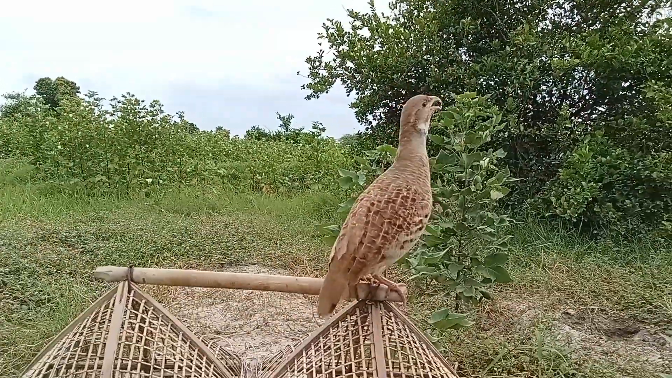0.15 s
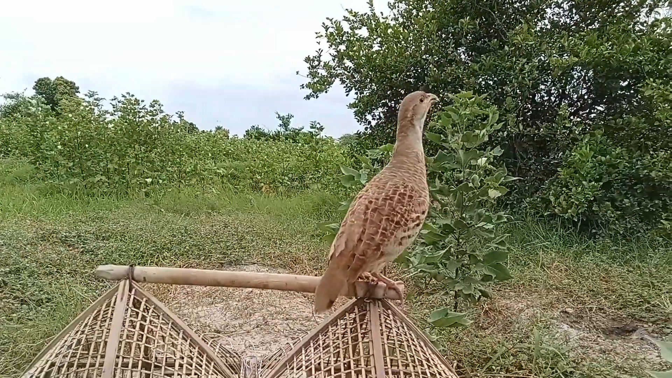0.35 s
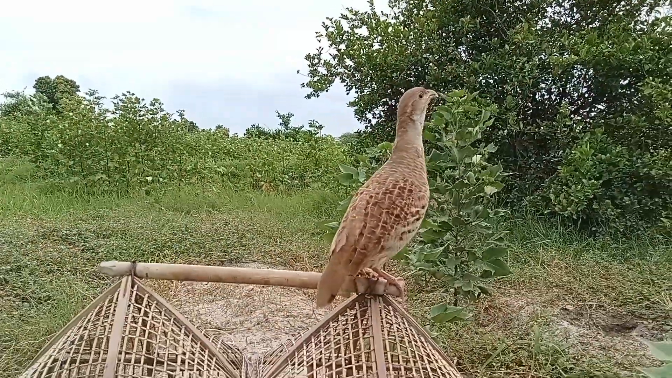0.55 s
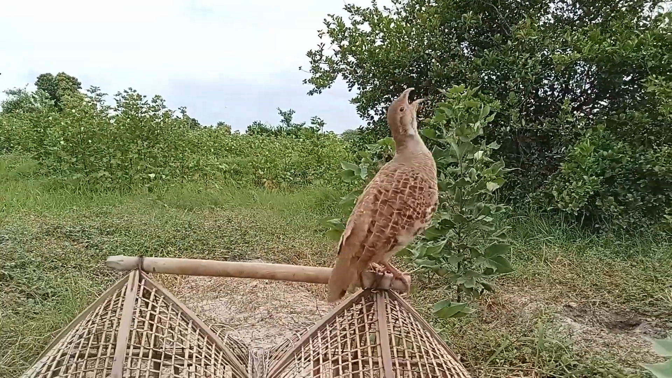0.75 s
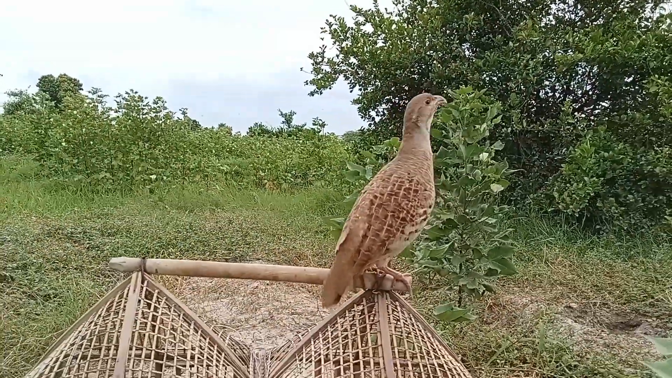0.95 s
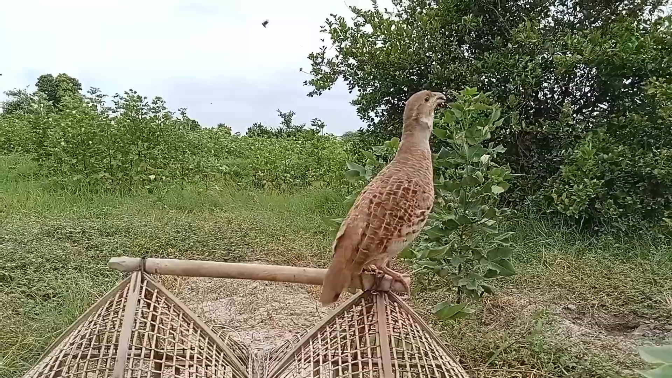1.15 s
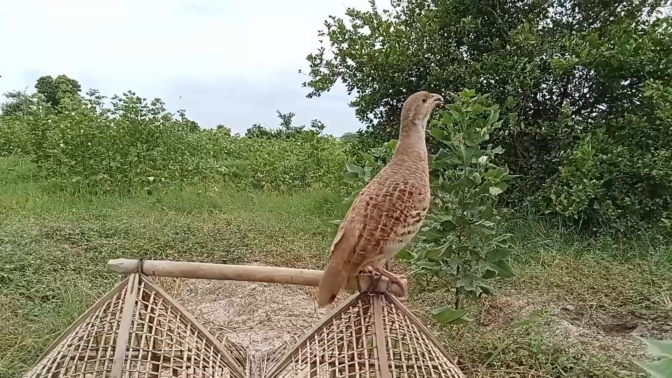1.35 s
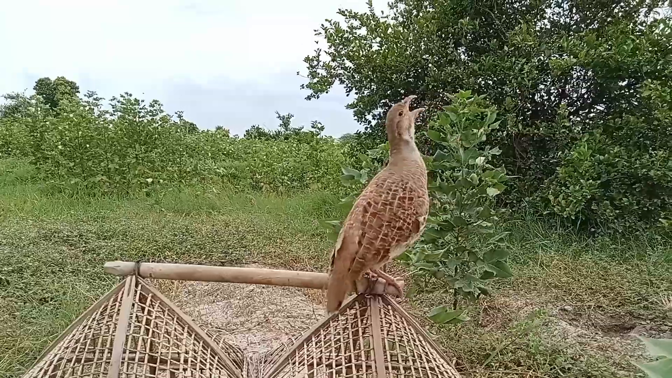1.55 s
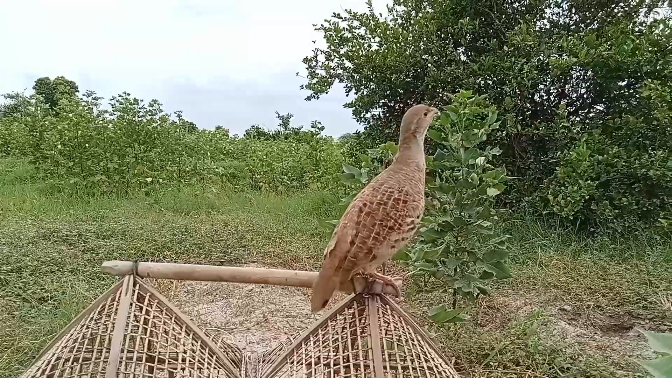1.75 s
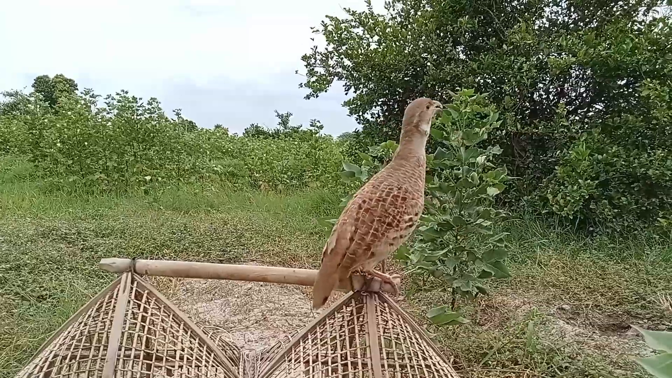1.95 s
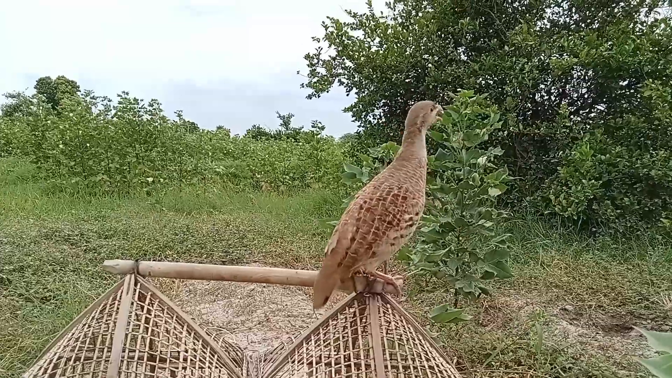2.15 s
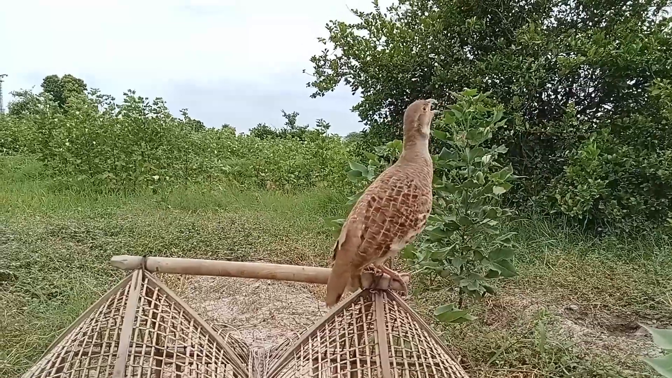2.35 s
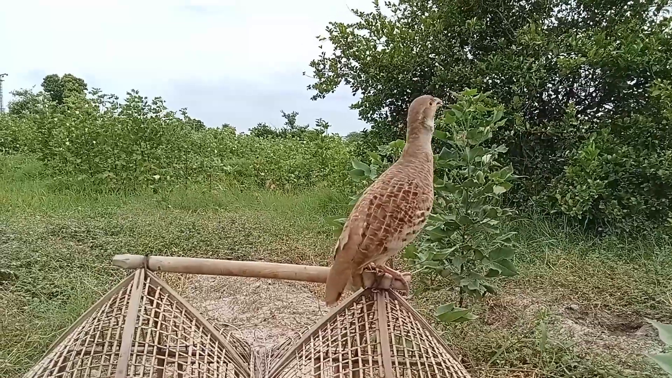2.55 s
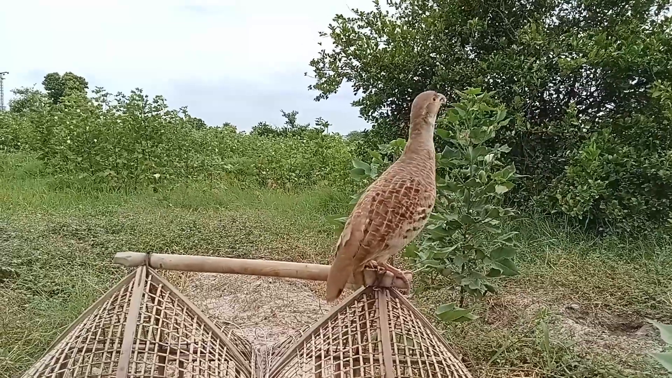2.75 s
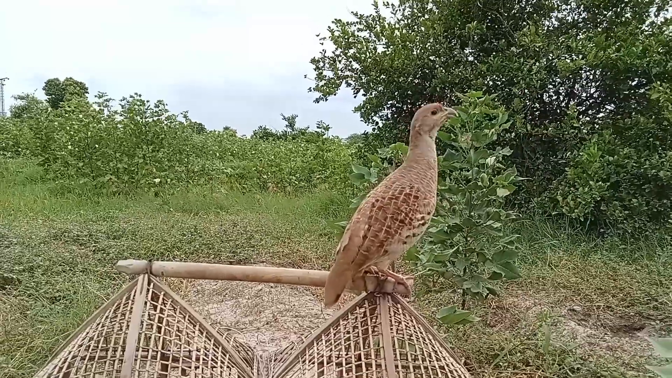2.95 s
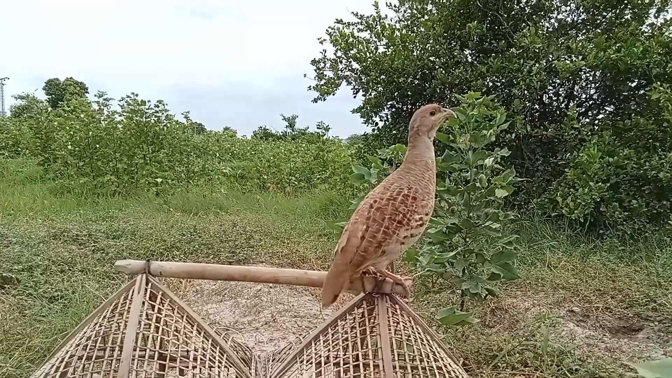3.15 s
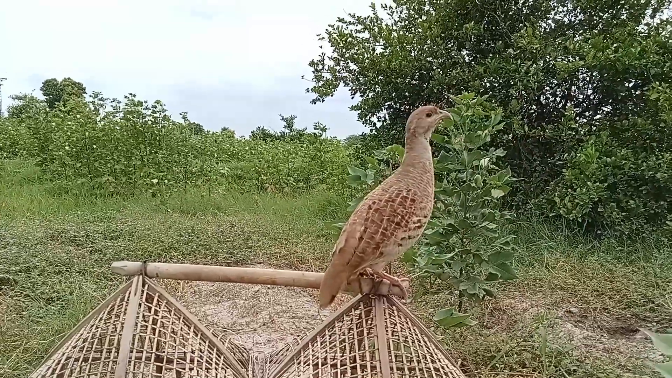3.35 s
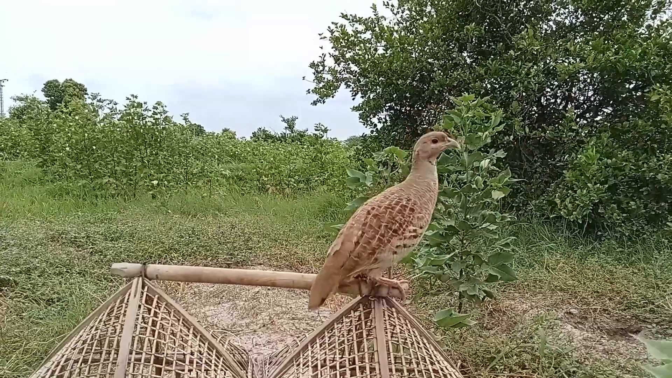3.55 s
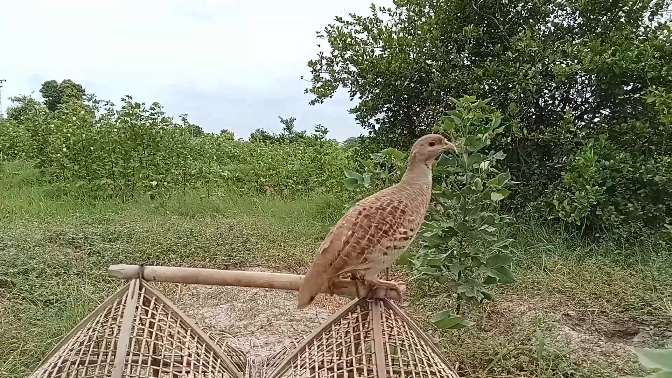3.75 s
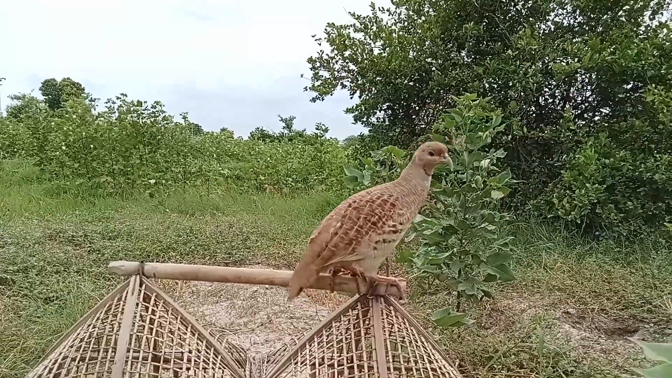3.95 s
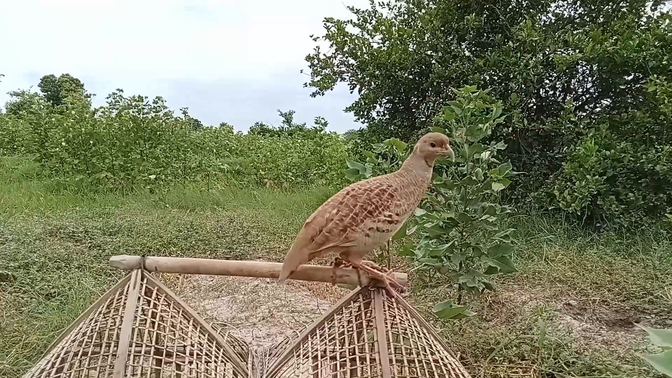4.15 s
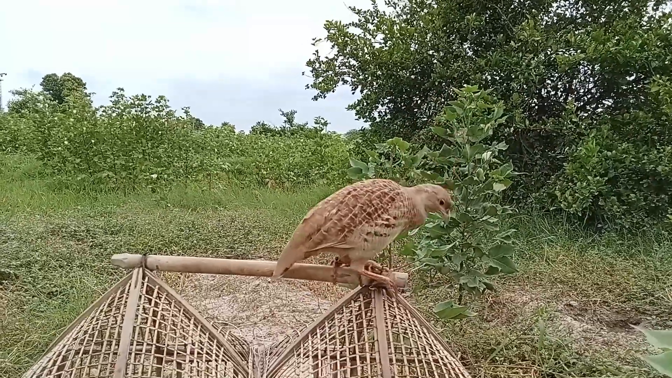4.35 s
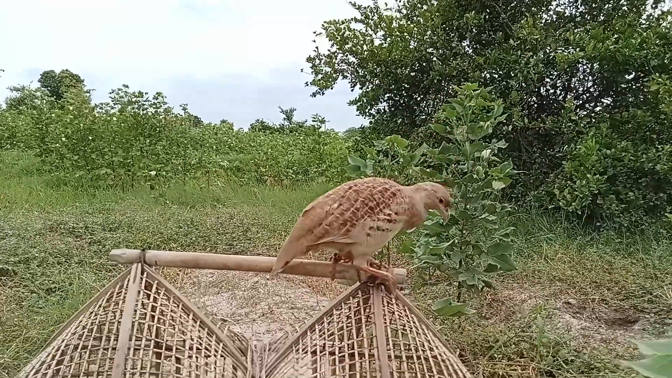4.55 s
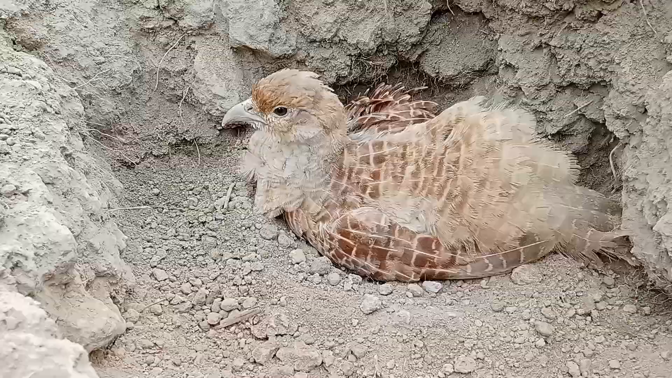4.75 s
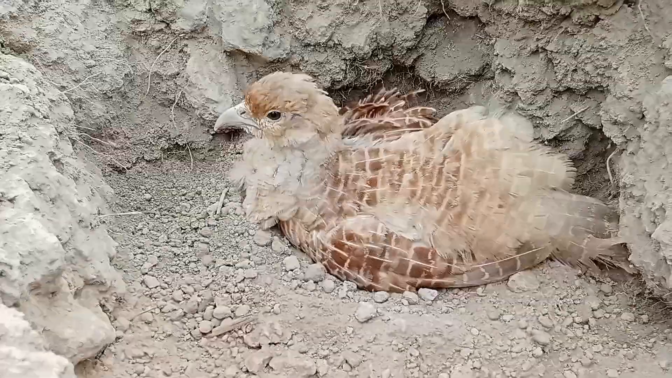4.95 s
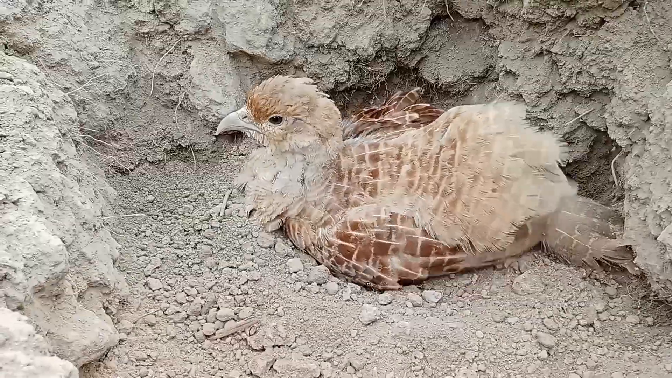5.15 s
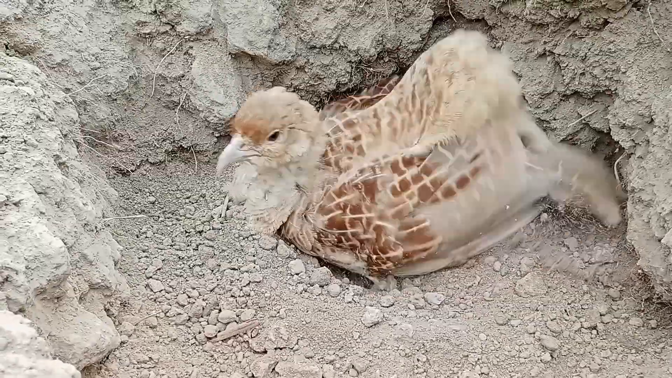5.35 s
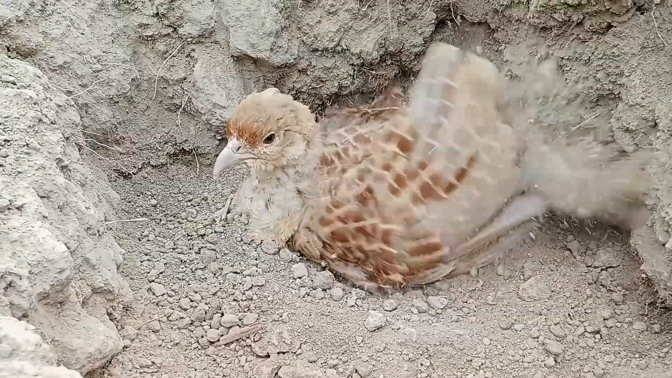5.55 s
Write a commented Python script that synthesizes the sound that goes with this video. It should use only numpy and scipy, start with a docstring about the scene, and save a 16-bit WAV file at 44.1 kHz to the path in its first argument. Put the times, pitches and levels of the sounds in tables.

```python
"""Francolins call in an open field: a voice of locked partials gives sharp clucks and ringing cries.
Soft mews come between, soon joined by a second bird's rising whistles, gliding tones with a thin hiss.
After a coo, a gust of coloured noise, decaying thumps and dry ticks buffets the microphone.
Four more mews and another coo follow. The sound drops out for a moment and returns over a dull rush;
then a bird shuffles in a dust bath, in short bouts of rustling noise."""
import sys
import numpy as np
from scipy import signal
from scipy.fft import rfft, irfft, next_fast_len
from scipy.io import wavfile
from scipy.ndimage import uniform_filter1d

SR = 44100
rng = np.random.default_rng(int(sys.argv[2]) if len(sys.argv) > 2 else 0)


def file_out(sig):
    """Save sig as 16-bit WAV at sys.argv[1]."""
    # one column per channel
    cols = np.atleast_2d(sig).T
    # limit, then scale
    lim = np.clip(cols, -1, 1)
    pcm = np.round(lim * 32767).astype(np.int16)
    wavfile.write(sys.argv[1], SR, pcm)


N = 250929
TIME = np.arange(N) / SR
TOP_HZ = 15650  # upper limit of the voices' partials and of the whole sound

# clucks: peak_s, rise_s, fall_s, pitch_hz (at the peak), level_db, added_roughness (0-1)
CLUCK_NOTES = [(.001, 0.025, 0.034, 490, -30, 0.56), (0.101, 0.047, 0.023, 525, -16, 0.08),
               (.220, 0.04, 0.028, 508, -16.5, 0.17), (0.344, 0.038, 0.02, 489.3, -19.5, 0.28),
               (0.454, 0.035, 0.026, 450.6, -25.5, 0.46), (.976, 0.049, 0.015, 525.3, -16.5, 0.01),
               (1.091, 0.038, 0.023, 512.3, -16, 0.1), (1.212, 0.036, 0.032, 517.3, -17.5, 0.17),
               (1.324, 0.026, 0.0087, 508, -28, 0.73), (1.735, 0.046, 0.015, 521, -18, 0),
               (1.844, 0.035, .033, 518.6, -17, 0.08), (1.961, 0.033, 0.029, 492.3, -21, 0.44),
               (2.47, 0.046, 0.015, 525, -17.5, 0.05), (2.572, 0.033, 0.03, 513.4, -18, 0.15),
               (2.699, 0.045, 0.017, 445, -24, 0.59)]
# cries: clear_onset_s, pitch_ratio, level_db
CRY_NOTES = [(.672, 1.016, -20.5), (1.429, 1.023, -19), (2.161, 1, -20.5)]
# mews: start_s, end_s, pitch_hz, glide_share (of pitch), final_sag_share (of pitch), level_db,
# roughness (0-1), brightness_db, undertone_db (at the start)
MEW_NOTES = [(0.5, 0.585, 576, 0.046, 0.11, -34, 0.14, -3, -19),
             (0.576, 0.656, 514, -0.049, .02, -37, 0.18, 1, -37),
             (.902, 1, 528.6, 0.28, .04, -37, 0, 4.5, -29.5),
             (0.986, 1.061, 544, -0.24, .06, -35, 0.05, -8, -25),
             (1.213, 1.269, 592, -.15, .03, -38, 0.2, 13.5, -40),
             (1.85, 1.948, 533, 0.034, .04, -40, 0, 12, -25.5),
             (2.864, 2.932, 594, -.15, 0.017, -42.5, 0.1, -1, -25.5),
             (3.61, 3.768, 705, -0.17, 0.35, -34, 0.15, 7.5, -1),
             (3.887, 4.036, 589.6, -.17, 0.25, -37.5, 0.1, 4.5, -31),
             (4.143, 4.309, 581, -0.08, 0.36, -36.5, 0.09, 0, -23),
             (4.428, 4.589, 566, -0.065, 0.3, -35.5, 0.14, -2, -23.5)]
# coos: start_s, end_s, first_pitch_hz, settled_pitch_hz, level_db
COO_NOTES = [(2.625, 2.777, 849, 654, -39.5), (3.833, 3.891, 950, 585, -45)]
# strengths of a coo's first four partials: level_db
COO_PARTIAL_LEVELS = [0.5, -8, -13.5, -25.5]
# whistles: start_s, loudest_s, end_s, first_pitch_hz, limiting_pitch_hz, level_db
WHISTLE_NOTES = [(1.263, 1.291, 1.435, 1950, 3008, -21.5), (1.905, 1.958, 2.112, 2070, 2970, -25),
                 (2.628, 2.705, 2.858, 1960, 2932, -24)]
# throat and beak resonance in the clucks: frequency_hz, gain_db
CLUCK_RESONANCE = [(250, -16), (550, -1.5), (1100, 4), (1600, 3.5), (2300, 0.5), (3300, -9.5),
                   (4400, -24.5), (5700, -17.5), (7000, -53.5), (10000, -47.5), (12500, -35), (14300, -28),
                   (15600, -29)]
# throat and beak resonance in the cries: frequency_hz, gain_db
CRY_RESONANCE = [(250, -25.5), (520, -8.5), (1040, -1.5), (1560, 2), (2080, 2.5), (3120, -2), (4200, -14.5),
                 (5300, -17.5), (6200, -25), (7200, -52.5), (8400, -40.5), (10500, -43), (12400, -36),
                 (14500, -22)]
# throat and beak resonance in the mews: frequency_hz, gain_db
MEW_RESONANCE = [(250, -9), (550, -3), (850, -7.5), (1120, 4.5), (1650, -3), (2150, -25), (2800, -14.5),
                 (3400, -35.5), (4200, -46.5), (6000, -52.5), (7500, -70), (14000, -44)]
# spectrum of the whistles' hiss: frequency_hz, gain_db
WHISTLE_HISS_SPECTRUM = [(500, -10.5), (1500, -8.5), (2400, -6), (3300, 1.5), (4300, -8), (5600, -17.5),
                         (7000, -30), (10000, -35), (12500, -21), (15500, -22)]
# strength of the gust: time_s, level_db (relative)
GUST_COURSE = [(2.74, -44.5), (2.8, -42), (2.89, -34.5), (3.27, -34.5), (3.4, -44), (3.489, -54.5),
               (3.6, -70)]
# spectrum of the gust's body: frequency_hz, gain_db
GUST_SPECTRUM = [(50, -34), (100, -4.5), (150, -10.5), (250, -8.5), (390, 1.5), (550, -7.5), (720, -11.5),
                 (1000, -18), (1600, -24), (2700, -31.5), (4000, -43), (5500, -71.5), (9000, -69)]
# spectrum of the thin hiss in the gust and dust: frequency_hz, gain_db
HISS_SPECTRUM = [(600, -28), (1500, -28), (3500, 17.5), (5500, -2.5), (7500, -23.5), (10000, -14.5),
                 (12500, 14.5), (14500, 15), (15500, 16.5)]
# buffets: start_s, level_db (relative), pitch_hz
BUFFET_THUMPS = [(2.856, -20.5, 392), (2.902, -20, 427), (3.036, -16.5, 388), (3.098, -22.5, 139),
                 (3.152, -17, 423), (3.214, -16.5, 377), (3.235, -27.5, 310), (3.273, -24, 190),
                 (3.335, -22, 383), (3.361, -27, 102), (3.54, -24.5, 177)]
# ticks and scrapes within the gust: start_s, initial_level_db, decay_s
TICK_EVENTS = [(2.905, -35, .006), (2.947, -44, .001), (2.957, -31, .009), (3.06, -43, .0008),
               (3.079, -44, .003), (3.118, -42, .0008), (3.177, -40, .0008), (3.236, -41, .0008)]
# spectrum of the ticks and the gust's crackle: frequency_hz, gain_db
TICK_SPECTRUM = [(500, 7.5), (1800, 10.5), (3500, -2.5), (5000, -23.5), (8000, -46), (11000, -25),
                 (14500, -13)]
# bouts of shuffling in dust: start_s, end_s, level_db, hiss_db
SHUFFLE_BOUTS = [(5.301, 5.412, -49, -75), (5.443, 5.566, -47, -64.5), (5.598, 5.644, -42, -65),
                 (5.636, 5.72, -48, -62)]
# spectrum of the dust's rustle: frequency_hz, gain_db
RUSTLE_SPECTRUM = [(120, -11.5), (200, -1.5), (600, -6), (908, -15), (1210, -19.5), (1950, -29),
                   (2080, -31.5), (3250, -33.5), (4840, -62), (9000, -59.5), (11700, -91.5), (19800, -120)]
# soft puffs of air on the microphone: centre_s, half_length_s, level_db (relative)
AIR_PUFFS = [(0.98, 0.035, -36.5), (1.248, 0.1, -40.5), (3.594, 0.17, -44.5), (3.897, 0.06, -42.5),
             (4.286, 0.025, -43.5), (4.574, 0.049, -48.5)]
# spectrum of the rumble of air: frequency_hz, gain_db
RUMBLE_SPECTRUM = [(25, -34.5), (45, -9.5), (62, 3.5), (85, 1.5), (110, -5.5), (160, -24), (320, -68)]
# spectrum of the flutter of air: frequency_hz, gain_db
FLUTTER_SPECTRUM = [(60, -22), (110, -2.5), (140, 7.5), (200, -3.5), (300, -15.5), (700, -64)]
# spectrum of the quiet field: frequency_hz, gain_db
FIELD_SPECTRUM = [(120, -34.5), (200, -1), (309, -9.5), (370, -5.5), (946, -20.5), (1020, -23), (1220, -22),
                  (4090, -36), (6770, -54), (15000, -63)]
# faint far hum: start_s, end_s, pitch_hz, level_db (before it wavers)
HUM_NOTES = [(-.03, 0.326, 555, -55), (0.323, 1.253, 422, -64), (1.19, 2.234, 435.5, -57),
             (2.206, 2.445, 423, -49)]

# course of a cluck, in places: -1 rise time before the peak, 0 peak, 1 fall time after it
CRACK_PLACE, CRACK_WIDTH, RASP_PLACE, RASP_WIDTH = -.41, .13, .68, 0.23
CLUCK_LEAD, CLUCK_TRAIL = 1.05, 1.2  # how far the voice reaches before and after the peak
CLUCK_SWEEP_OCTAVES, CLUCK_SAG = 1.8, 0.19  # per unit of place: up to the crack, down after it
CLUCK_RISE_DB, CLUCK_FALL_DB = 23, 14  # per unit of place
CRACK_DB, CLUCK_RING_DB = 4, 1.4  # extra level at the crack and at the very peak
# course of a cry, in s from its clear onset
CRY_LEAD_S, CRY_CATCH_S, CRY_BREAK_S = .038, 0.0088, .042
CRY_RESUME_S, CRY_FRAY_S, CRY_END_S = .066, .133, .155
CRY_HZ, CRY_FALL_S, CRY_FALL_HZ_PER_S = 513.2, 0.078, 1750
CRY_OVERSHOOT_HZ, CRY_SETTLE_S = 18, 0.0089  # each clear tone starts sharp and settles
CRY_RASP_DB, CRY_CATCH_DB, CRY_BREAK_TONE_DB = -9, -11, -7.5
CRY_BREAK_SWELL_DB, CRY_TREMOR_DB = 1, 5.5
MEW_SCOOP, MEW_SCOOP_S = .3, .011  # share of the pitch, and its decay
WHISTLE_GLIDE_S, WHISTLE_SWELL_DB, WHISTLE_FADE_DB, WHISTLE_FADE_S = .085, 13.5, 14, .075
AIR_DB, AIR_SWELL_DB = -51, 2  # rumble at rest, and its rise once the gust has come
HOLLOW_DB, HOLLOW_HISS_DB = -60.5, -93  # underlying rush at the dust bath
FIELD_DB = -60.5
DROP_S, DROP_FADE_S, RETURN_S, RETURN_FADE_S = 4.63, 0.025, 4.775, 0.13


def clucks(clear_rough=0.028, crack_rough=0.38, rasp_rough=0.83, sweep_odd_db=-24, ring_odd_db=4,
           sweep_pure_db=2, ring_pure_db=13):
    """Frequency sweep and mode locking: up about an octave, a crack, a ringing third partial, a rasp."""
    out = np.zeros(N)
    for peak, rise, fall, pitch_hz, note_db, hoarse in CLUCK_NOTES:
        i = between(peak - CLUCK_LEAD * rise, peak + CLUCK_TRAIL * fall)
        t = TIME[i] - peak
        place = t / np.where(t < 0, rise, fall)
        crack = bell(place, CRACK_PLACE, CRACK_WIDTH)
        rasp = bell(place, RASP_PLACE, RASP_WIDTH)
        cracked = (1 + np.tanh((place - CRACK_PLACE) / CRACK_WIDTH)) / 2

        sweep = 2 ** (CLUCK_SWEEP_OCTAVES * np.minimum(place - CRACK_PLACE, 0))
        sag = 1 - CLUCK_SAG * np.maximum(place, CRACK_PLACE)
        db = np.minimum(CLUCK_RISE_DB * place, -CLUCK_FALL_DB * place)
        db = db + CRACK_DB * crack + CLUCK_RING_DB * bell(place, 0, .15)
        rough = hoarse * cracked + clear_rough + crack_rough * crack + rasp_rough * rasp
        odd_db = sweep_odd_db * (1 - cracked) + ring_odd_db * cracked
        pure_db = (sweep_pure_db + ring_pure_db * bell(place, 0.31, 0.66)) * (1 - hoarse)
        voice = syrinx(pitch_hz * sweep * sag, rough, odd_db, pure_db, CLUCK_RESONANCE,
                       order=3, ring=1.0, blur_hz=6000)

        # the top of the treble only gets out while the beak is wide open
        voice = muffle(voice, (np.abs(place + .1) - .4) / .7, edge_hz=4200, shut_db=-12)
        closing = np.maximum(0.57 * (CRACK_PLACE - place), 0.067 * (place - CRACK_PLACE))
        voice = muffle(voice, closing.clip(0, .6) + 2.6 * hoarse)
        out[i] += undb(note_db + db) * hold(place, place[0], place[-1], 0.067, 0.22) * voice
    return out


def cries(closing_s=0.065, edge_s=0.0065, clear_rough=0.0083, rasp_rough=0.6, rasp_odd_db=-3,
          clear_odd_db=-30, rasp_pure_db=-9, locked_db=18, loose_db=17, fray_db=19):
    """Mode locking: a rasp and catch, then two clear tones, an octave-lower break between, and a fray."""
    out = np.zeros(N)
    for onset, ratio, note_db in CRY_NOTES:
        i = between(onset - CRY_LEAD_S, onset + CRY_END_S)
        t = TIME[i] - onset
        first = hold(t, -edge_s / 2, CRY_BREAK_S + edge_s, edge_s, 0.0097)
        second = hold(t, CRY_RESUME_S - edge_s, CRY_FRAY_S + edge_s, edge_s, 0.0037)
        clear = first + second
        frayed = np.clip((t - CRY_FRAY_S) / .015 + 1, 0, 1)
        sharp = np.exp(-np.abs(t) / CRY_SETTLE_S) + np.exp(-np.abs(t - CRY_RESUME_S) / CRY_SETTLE_S)
        fall_hz = CRY_FALL_HZ_PER_S * np.maximum(t - CRY_FALL_S, 0)
        hz = ratio * (CRY_HZ + CRY_OVERSHOOT_HZ * sharp - fall_hz)

        # midway through each tone the lock loosens and the octave below comes in
        loose = bell(t, 0.025, 0.011) + bell(t, .094, 0.009)
        pure_db = rasp_pure_db * (1 - clear) + clear * (locked_db - loose_db * loose)
        pure_db = pure_db + fray_db * frayed * (1 - clear)
        odd_db = rasp_odd_db * (1 - clear) + clear_odd_db * clear * (1 - frayed)
        rough = clear_rough + rasp_rough * (1 - clear)
        voice = syrinx(hz, rough, odd_db, pure_db, CRY_RESONANCE, order=4, ring=0.17, blur_hz=17000)
        voice = muffle(voice, (t - closing_s) / .03, edge_hz=9700, shut_db=-7)
        voice = muffle(voice, (t - closing_s) / 0.083)

        # the break between the tones swells slightly; the second tone trembles more and more
        tremor = np.clip((t - CRY_RESUME_S) / .05, 0, 1) * np.tanh(wobble(110, len(i)))
        db = CRY_RASP_DB * (1 - clear) + CRY_CATCH_DB * bell(t, -CRY_CATCH_S, 0.008)
        db = db + CRY_BREAK_SWELL_DB * bell(t, 0.058, 0.013) + CRY_TREMOR_DB * tremor
        low_tone = undb(CRY_BREAK_TONE_DB) * np.sin(2 * np.pi * np.cumsum(2 * hz) / SR)
        low_tone = low_tone * hold(t, CRY_BREAK_S, CRY_RESUME_S + edge_s, 0.0036, edge_s)
        out[i] += undb(note_db) * hold(t, t[0], t[-1], .007, 0.004) * (undb(db) * voice + low_tone)
    return out


def mews(attack=.2, release=0.072, fade_db=5.0, waver_db=0.87, nasal=0.27, nasal_hz=1480):
    """Subharmonics and nasal resonance: notes scoop up, glide and sink into an undertone an octave below."""
    out = np.zeros(N)
    for start, end, pitch_hz, glide, sag, note_db, rough, bright_db, under_db in MEW_NOTES:
        i = between(start, end)
        place = np.linspace(0, 1, len(i))
        slack = place ** 4  # the membranes lose tension at the end
        scoop = MEW_SCOOP * np.exp((start - TIME[i]) / MEW_SCOOP_S)
        hz = pitch_hz * (1 + glide * place - sag * slack - scoop + 0.008 * wobble(41, len(i)))
        swell = hold(place, 0, 0.94, attack, release) ** 1.2
        swell = swell * undb(fade_db * (0.5 - place) + waver_db * wobble(35, len(i)))

        throat = [(f, db + bright_db * (2000 < f < 7000)) for f, db in MEW_RESONANCE]
        # the third partial and its multiples ring out unevenly in the middle of the note
        ring_db = 3 * np.sin(np.pi * place) + 5.2 * wobble(28, len(i))
        note_rough = rough + .22 * slack + 0.084 * bell(place, 0, .13)
        undertone_db = under_db * (1 - place ** 3.1) ** 2.2
        # built on half the pitch, so that the odd partials are the undertone
        voice = syrinx(hz / 2, note_rough, undertone_db, ring_db, throat, order=6, ring=0, blur_hz=6500)
        nose = signal.lfilter(*signal.iirpeak(nasal_hz, 2.6, fs=SR), voice)
        voice = unit(voice + nasal * nose)
        out[i] += undb(note_db) * swell * muffle(voice, 1.3 * place ** 3)
    return out


def coos(settle_s=0.02, waver=0.016):
    """Harmonic addition: four partials, strongest at the fundamental, drop in pitch and settle."""
    out = np.zeros(N)
    for start, end, first_hz, last_hz, note_db in COO_NOTES:
        i = between(start, end)
        hz = last_hz + (first_hz - last_hz) * np.exp((start - TIME[i]) / settle_s)
        hz = hz * (1 + waver * wobble(60, len(i)))
        phase = 2 * np.pi * np.cumsum(hz) / SR
        tone = sum(undb(db) * np.sin(k * phase) for k, db in enumerate(COO_PARTIAL_LEVELS, 1))
        out[i] += undb(note_db) * hold(TIME[i], start, end, 0.019, 0.021) * tone
    return out


def whistles(octave_db=-30, air_db=-46, air_attack_s=0.041, air_linger_s=0.039, air_release_s=0.077):
    """Near-sinusoidal oscillation: the pitch rises to a limit, with a faint octave and a lingering hiss."""
    out = np.zeros(N)
    for start, loudest, end, first_hz, top_hz, note_db in WHISTLE_NOTES:
        i = between(start, end + air_linger_s)
        t = TIME[i]
        hz = top_hz + (first_hz - top_hz) * np.exp((start - t) / WHISTLE_GLIDE_S)
        swell_db = WHISTLE_SWELL_DB * (t - loudest) / (loudest - start)
        fade_db = WHISTLE_FADE_DB * (np.exp((loudest - t) / WHISTLE_FADE_S) - 1)
        db = np.where(t < loudest, swell_db, fade_db)
        phase = 2 * np.pi * np.cumsum(hz * (1 + .003 * wobble(200, len(i)))) / SR

        # the octave comes out as the pitch nears its top
        octave_gain = undb(octave_db + 8 * bell(hz / top_hz, 1.0, .05))
        octave = octave_gain * np.sin(2 * phase + .4 * wobble(250, len(i)))
        tone = np.sqrt(2) * undb(note_db + db) * (np.sin(phase) + octave)
        air_gain = undb(air_db + .21 * (db - db.mean()) + 1.3 * wobble(60, len(i)))
        air = air_gain * noise(WHISTLE_HISS_SPECTRUM, len(i))
        out[i] += hold(t, start, end, 0.0041, .025) * tone
        out[i] += hold(t, start, t[-1], air_attack_s, air_release_s) * air
    return out


def syrinx(hz, rough, odd_db, pure_db, throat, order, ring, blur_hz, jitter=0.064, shimmer=.45, rasp=0.92):
    """Source and filter: membranes lock on every order-th partial when pure, stumble and rasp when rough."""
    size = len(hz)
    phase = 2 * np.pi * np.cumsum(hz * (1 + jitter * rough * wobble(360, size))) / SR
    k = np.arange(1, 49)[:, None]
    # the throat is tuned to the locked partial and lifts it further
    locked = (k % order == 0) + ring * (k == order)
    gains = gain_at(throat, k * hz) * undb(odd_db * (k % 2) + pure_db * locked) * (k * hz < TOP_HZ)
    gains = gains / np.sqrt(np.sum(gains ** 2, axis=0) / 2)

    # turbulence smears the high partials towards noise, and all of them in rough moments
    smear_depth = np.minimum((k * hz / blur_hz) ** 2 + 1.3 * rough, 1.8)
    smear = smear_depth * np.array([wobble(200, size) for _ in k])
    tone = np.sum(gains * np.sin(k * phase + smear + rng.uniform(0, np.pi, k.shape)), axis=0)
    tone = tone * (1 + shimmer * rough * wobble(270, size))
    air = noise(throat, size) * (1 + 0.12 * np.cos(phase)) * undb(-np.maximum(pure_db, 0) / 2)
    return (tone + rasp * rough * air) / np.sqrt(1 + rough ** 2 / 2)


def muffle(voice, closing, edge_hz=2150, shut_db=-19):
    """Low-pass radiation: a closing beak (0 open, 1 shut) takes the treble off."""
    body = signal.sosfiltfilt(signal.butter(2, edge_hz, fs=SR, output="sos"), voice)
    treble_gain = undb(shut_db * uniform_filter1d(np.clip(closing, 0, 1), size=300))
    return body + treble_gain * (voice - body)


def outdoors(x, ground=0.12, ground_s=.00578, bushes_db=-25, t60=0.29):
    """Reflection and scattering: one bounce off the ground and a thin, dull scatter from the bushes."""
    t = TIME[:SR // 2]
    scatter = noise([(300, 5), (1700, -8.0), (3000, -2.5), (6000, -24.0), (14000, -35)], len(t))
    scatter = scatter * undb(-60 * t / t60) * np.minimum(t / 0.0044, 1)
    tail = signal.fftconvolve(x, scatter / np.linalg.norm(scatter))[:N]
    bounce = np.interp(TIME - ground_s, TIME, x, left=0)
    return x + ground * bounce + undb(bushes_db) * tail


def gust(body_db=2.0, hiss_db=-25, hiss_power=1.2, crackle_db=-14, crackle_spread_db=5):
    """Turbulence at the microphone: crackle follows the wind's strength; the hiss dies away faster."""
    strength = gust_strength()
    hiss = undb(hiss_db) * strength.max() * (strength / strength.max()) ** hiss_power
    grains = unit(undb(crackle_spread_db * wobble(407)) * noise(TICK_SPECTRUM))
    crackle = undb(crackle_db) * strength * grains
    return rush(undb(body_db) * strength, hiss, GUST_SPECTRUM, eddy_db=6.0) + crackle


def gust_strength():
    """Amplitude envelope: the gust's relative gain over time."""
    s, db = np.transpose(GUST_COURSE)
    return undb(np.interp(TIME, s, db)) * hold(TIME, s[0], s[-1], 0.023, 0.018)


def rush(body, hiss, colour, eddy_db):
    """Amplitude modulation: each eddy swells a low rustle and a thin hiss together."""
    eddies = undb(eddy_db * 2 * np.tanh(wobble(90) / 2))
    return body * unit(eddies * noise(colour)) + hiss * unit(eddies * noise(HISS_SPECTRUM))


def buffets(cycles=0.79, push_db=1):
    """Pressure pulses: the strongest eddies thump the microphone in brief damped oscillations."""
    out = np.zeros(N)
    for start, db, hz in BUFFET_THUMPS:
        i = between(start, start + 0.028)
        turns = (TIME[i] - start) * hz
        envelope = (turns / cycles * np.exp(1 - turns / cycles)) ** 2
        out[i] += undb(db + push_db) * np.sin(2 * np.pi * turns) * envelope
    return out


def ticks():
    """Impulsive excitation: short dry ticks and scrapes of exponentially decaying noise."""
    out = np.zeros(N)
    for start, db, decay_s in TICK_EVENTS:
        i = between(start, start + .04)
        out[i] += undb(db) * np.exp((start - TIME[i]) / decay_s) * noise(TICK_SPECTRUM, len(i))
    return out


def dust_bath(attack_s=.016, release_s=0.025, stir_db=-58, stir_hiss_db=-83):
    """Granular friction: feathers shuffle in dust, hissing more through each bout, over trickle and rush."""
    started = TIME > RETURN_S
    # the trickle sets in with the first shuffle
    stirred = np.clip((TIME - SHUFFLE_BOUTS[0][0]) / 0.25, 0, 1)
    body = undb(HOLLOW_DB) * started + undb(stir_db) * stirred
    hiss = undb(HOLLOW_HISS_DB) * started + undb(stir_hiss_db) * stirred
    for start, end, db, hiss_db in SHUFFLE_BOUTS:
        bout = hold(TIME, start, end, attack_s, release_s)
        progress = np.clip((TIME - start) / (end - start), 0, 1)
        body = np.hypot(body, undb(db) * bout)
        hiss = np.hypot(hiss, undb(hiss_db) * bout * progress ** .4)
    return rush(body, hiss, RUSTLE_SPECTRUM, eddy_db=3.0)


def background(gust_rumble_db=-3, gust_flutter_db=-4, rest_flutter_db=-11, puff_rumble_db=-3,
               puff_flutter_db=-1):
    """Incoherent addition: air rumbles and flutters, more in puffs and the gust, over the quiet field."""
    rest = undb(AIR_DB + AIR_SWELL_DB * hold(TIME, GUST_COURSE[0][0], RETURN_S, 0.61, .1))
    puffs = sum(undb(db) * bell(TIME, centre, half) for centre, half, db in AIR_PUFFS)
    strength = gust_strength()
    rumble = np.hypot(rest, undb(puff_rumble_db) * puffs + undb(gust_rumble_db) * strength)
    moving_flutter = undb(puff_flutter_db) * puffs + undb(gust_flutter_db) * strength
    flutter = np.hypot(undb(rest_flutter_db) * rest, moving_flutter)
    field = undb(FIELD_DB + wobble(4)) * noise(FIELD_SPECTRUM)
    return rumble * noise(RUMBLE_SPECTRUM) + flutter * noise(FLUTTER_SPECTRUM) + field


def hum(waver_db=5.0, edge_s=0.056):
    """Amplitude modulation of pure tones: a faint far hum that wavers and swells."""
    notes = np.zeros(N)
    for start, end, hz, db in HUM_NOTES:
        notes += undb(db) * hold(TIME, start, end, edge_s, edge_s) * np.sin(2 * np.pi * hz * TIME)
    return np.sqrt(2) * notes * undb(waver_db * wobble(23))


def noise(colour, size=N):
    """Spectral shaping: white noise filtered to a colour, at rms 1."""
    spectrum = rfft(rng.standard_normal(size))
    return unit(irfft(spectrum * gain_at(colour, np.fft.rfftfreq(size, 1 / SR)), size))


def wobble(hz, size=N):
    """Low-pass random fluctuation of rms about 1, mostly slower than hz."""
    length = next_fast_len(size + SR // 10)
    lowpass = np.exp(-(np.fft.rfftfreq(length, 1 / SR) / hz) ** 2)
    return unit(irfft(rfft(rng.standard_normal(length)) * lowpass))[:size]


def gain_at(colour, hz):
    """Frequency response: gain of a colour, interpolated in dB over log frequency."""
    f, db = np.transpose(colour)
    return undb(np.interp(np.log(hz + 1), np.log(f), db))


def undb(db):
    """Logarithmic level: decibels to amplitude gain."""
    return 10 ** (np.asarray(db) / 20)


def unit(x):
    """Normalisation: scale to a standard deviation of 1."""
    return x / (np.std(x) + 1e-12)


def bell(x, centre, width):
    """Gaussian envelope: a smooth bump of height 1."""
    return np.exp(-((x - centre) / width) ** 2)


def hold(t, start, end, attack, release):
    """Trapezoidal envelope: attack, hold at 1, release."""
    return np.clip(np.minimum((t - start) / attack, (end - t) / release), 0, 1)


def between(start, end):
    """Time sampling: the sample indices of a stretch of time."""
    return np.flatnonzero((TIME >= start) & (TIME < end))


def scene():
    """Superposition: birds in the open, wind around the microphone and a dust bath add linearly."""
    birds = outdoors(clucks() + cries() + mews() + coos() + whistles())
    return (birds + gust() + buffets() + ticks() + dust_bath() + background() + hum())[None]


def record(dry):
    """Gating and band limitation: the sound fades out and back in once, and the top is cut."""
    fade_out = (DROP_S - TIME) / DROP_FADE_S
    fade_in = (TIME - RETURN_S) / RETURN_FADE_S
    gate = np.clip(np.maximum(fade_out, fade_in), 0, 1)
    return signal.sosfilt(signal.ellip(10, .2, 90, TOP_HZ, fs=SR, output="sos"), dry * gate)


dry = scene()
out = record(dry)
file_out(out)
```